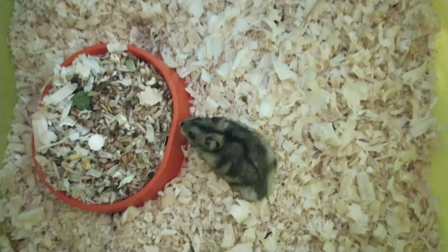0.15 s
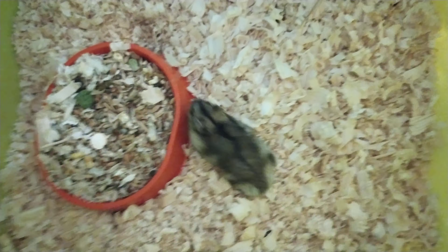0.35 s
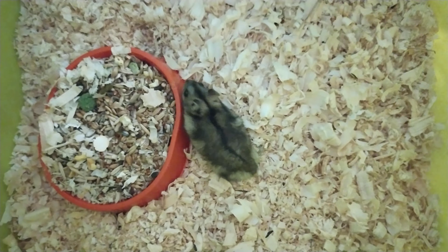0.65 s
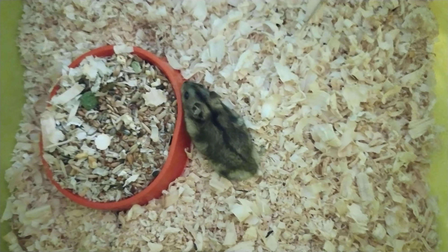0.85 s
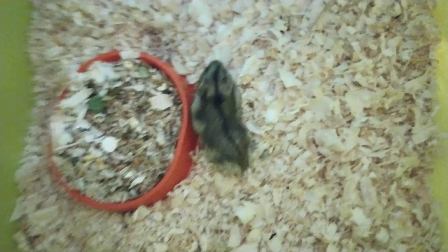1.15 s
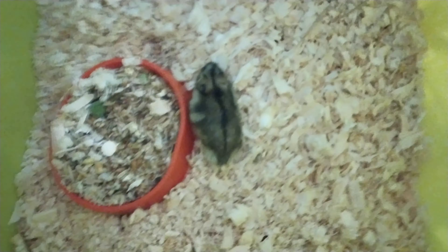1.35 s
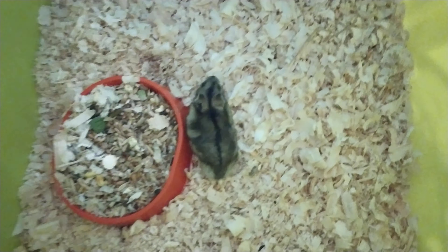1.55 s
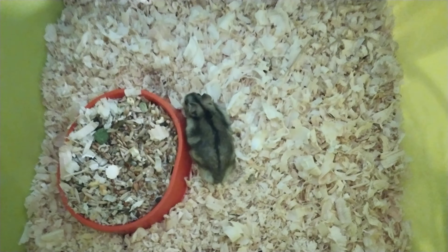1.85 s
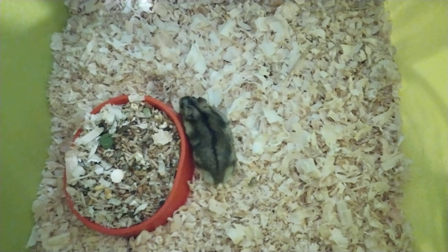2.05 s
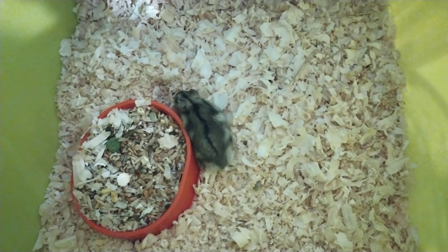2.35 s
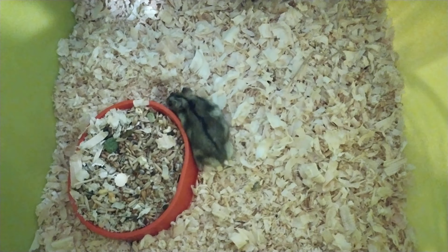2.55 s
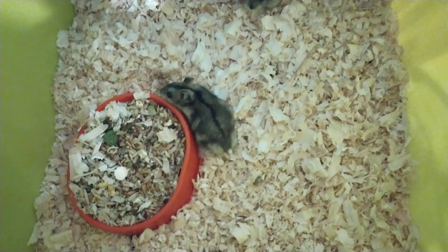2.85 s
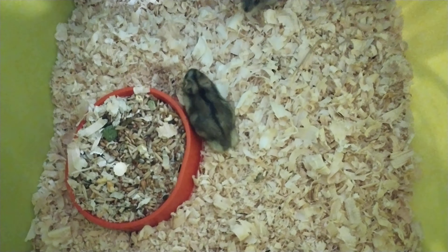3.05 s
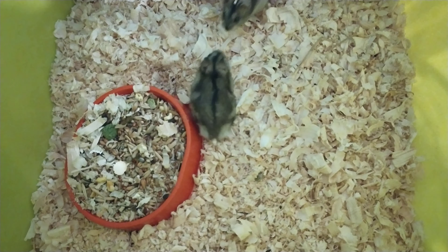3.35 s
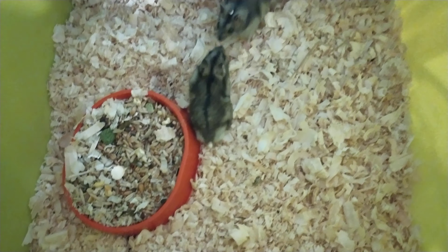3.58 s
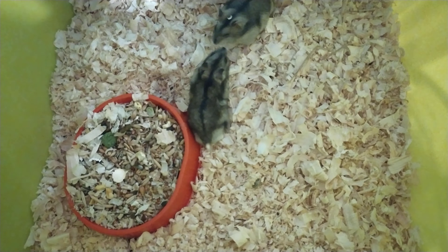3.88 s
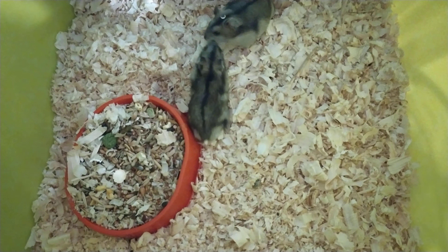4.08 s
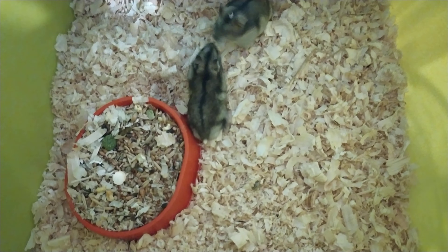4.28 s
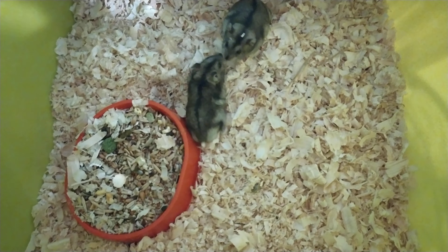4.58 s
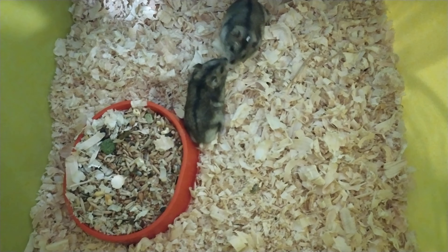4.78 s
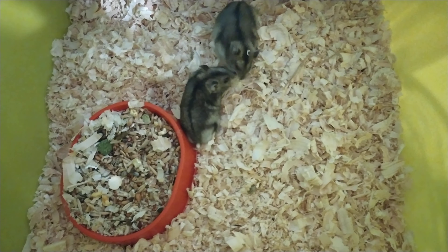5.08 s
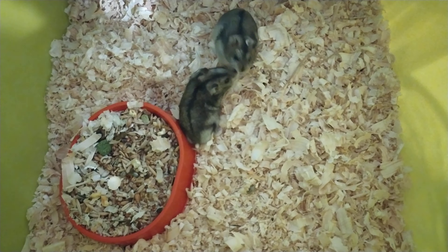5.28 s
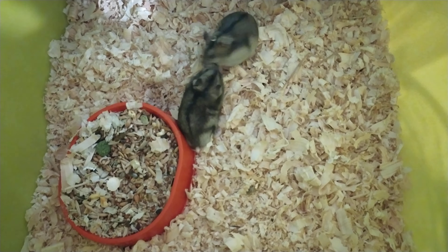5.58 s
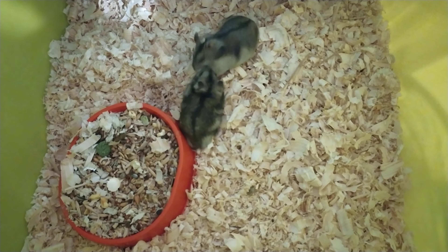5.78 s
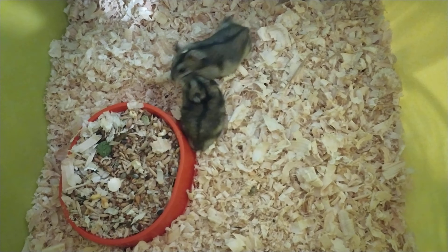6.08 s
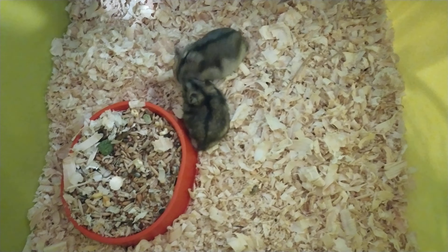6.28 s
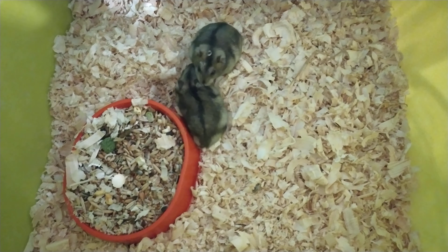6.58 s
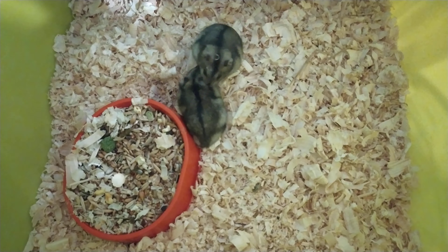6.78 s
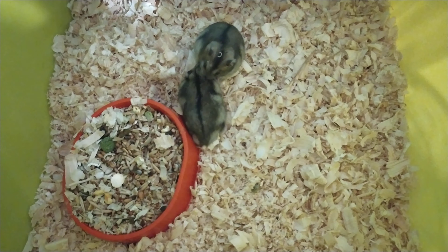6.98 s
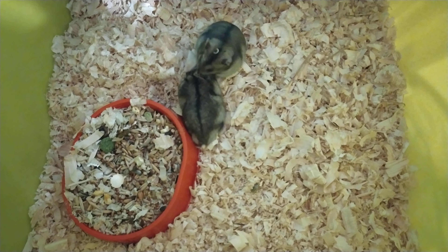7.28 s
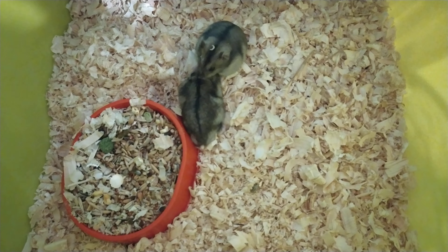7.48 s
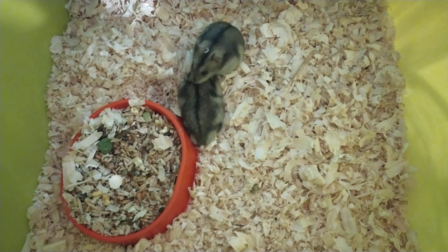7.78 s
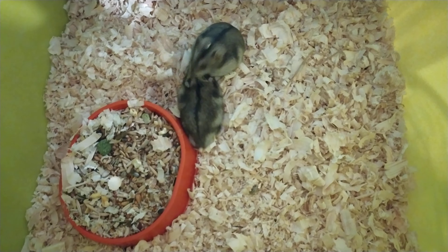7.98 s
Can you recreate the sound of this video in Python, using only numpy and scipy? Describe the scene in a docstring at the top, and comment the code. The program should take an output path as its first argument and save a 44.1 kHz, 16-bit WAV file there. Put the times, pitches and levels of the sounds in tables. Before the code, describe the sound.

Small animals shuffle in dry shavings inside a tub, making clumps of tiny crisp clicks. At first they are close and partly masked by boomy bumps and rumble from a hand gripping the microphone, including one startling tap on the left. After two seconds the handling fades; quieter intermittent rustles and snaps continue over faint hum, with muffled low swells and a late woody tick.

```python
"""Two dwarf hamsters shuffle through wood shavings in a plastic tub, heard by two microphones in a hand-held
casing. A quiet room hums throughout, and the flakes crackle in clumps of tiny clicks, with a snap now and then.
For the first two seconds the hand shifts its grip: the casing's modes knock, low noise rumbles, the skin groans,
and after one second a finger rubs, catches and taps on the left port. The rustle then loses its close
colour; soft dull swells follow from four seconds, and past seven a hamster bumps something hollow."""
import sys
import numpy as np
from scipy import signal
from scipy.fft import rfft, irfft
from scipy.io import wavfile

SR = 44100
rng = np.random.default_rng(int(sys.argv[2]) if len(sys.argv) > 2 else 0)


def master(y):
    """Save y as 16-bit WAV."""
    cut = np.clip(np.atleast_2d(y).T, -1, 1)
    pcm = np.round(cut * 32767)  # scale
    wavfile.write(sys.argv[1], SR, pcm.astype(np.int16))


N = 358923
T, HZ = np.arange(N) / SR, np.fft.rfftfreq(N, 1 / SR)

# tone of the dry flakes: pitch_hz [Hz], density_db [relative dB per Hz]
FLAKE_TONE = [(300, -29.5), (1000, -8.5), (2500, -7), (4800, -6.5), (6300, -5), (7700, -2), (9300, -1.8),
              (10800, -10.5), (13500, -8.5), (16000, -16)]
# a hamster shuffling through the shavings: start_s [s], length_s [s], level_db [dB before trim],
# crisp_db [dB, treble against that level, before trim]
SHUFFLE_MOVES = [(0.0, 0.39, -65, 1), (0.382, 0.21, -61.5, -27), (0.712, 0.2, -61.5, -1.5),
                 (0.925, 0.15, -56.5, -5), (1.064, 0.22, -60.5, 0.5), (1.512, 0.11, -62.5, -11),
                 (1.643, 0.2, -56.5, -7.5), (1.844, 0.53, -68, -1), (2.335, 0.14, -65, 2),
                 (2.552, 0.22, -69, 1), (2.763, 0.22, -67, 4.5), (3.027, 0.08, -63.5, 6),
                 (3.109, 0.082, -61, 2), (3.391, 0.087, -69.5, 9), (4.842, 0.27, -70.5, -4),
                 (5.21, 0.075, -67, 1), (5.428, 0.15, -66, -4), (5.595, 0.2, -64.5, -2),
                 (5.754, 0.26, -62, -2.5), (6.087, 0.064, -65.5, 0), (6.308, 0.073, -68.5, 1),
                 (6.43, 0.068, -68.5, 5), (6.549, 0.15, -70.5, -4.5), (6.745, 0.082, -69.5, 5),
                 (6.894, 0.035, -65.5, -6), (7.019, 0.15, -69, -7), (7.22, 0.065, -63.5, -21),
                 (7.593, 0.15, -66, -7), (7.781, 0.57, -72, -1.5)]
SHUFFLE_RISE_S, SHUFFLE_SETTLE_S = 0.027, 0.021  # the flakes get moving, and come to rest again
REST_DB = -74  # the bedding between shuffles, before trim


def amp(db):
    """Decibels to linear gain."""
    return 10 ** (np.asarray(db) / 20)


def evened(x):
    """Scales to unit rms, taken on the middle of a stereo pair."""
    return x / np.sqrt(np.mean(np.atleast_2d(x).mean(0) ** 2) + 1e-30)


def read(points, hz):
    """Reads a spectrum on a log-frequency axis."""
    f, value = np.transpose(points)
    return np.interp(np.log(hz + 1), np.log(f + 1), value)


def add(mix, s, sound):
    """Mixes a stereo sound in at a time in seconds."""
    part = mix[:, max(round(s * SR), 0):][:, :sound.shape[1]]
    part += sound[:, :part.shape[1]]


def sides(db):
    """Left and right gains for a level difference, left minus right."""
    return amp(np.array([[.5], [-.5]]) * db)


def coloured(x, spectrum):
    """Gives a sound its spectrum and the colour of the two microphone ports, at unit rms."""
    # balance of the ports: pitch_hz [Hz], left_minus_right_db [dB]
    port_balance = [(30, 5), (300, 3.5), (1000, 1.5), (3000, -4), (4800, 5), (6500, 12), (7700, 11),
                    (9300, -2.5), (11000, 0.5), (15000, 5.5)]
    gain = amp(read(spectrum, HZ)) * sides(read(port_balance, HZ))
    return evened(irfft(rfft(x) * gain, N))


def noise(shared):
    """Stereo white noise; a part of relative size `shared` is common to both sides."""
    return rng.standard_normal((2, N)) + shared * rng.standard_normal(N)


def drift(rate_hz):
    """Random wander of unit rms, with little motion faster than rate_hz."""
    return evened(irfft(rfft(rng.standard_normal(N)) * np.exp(-(HZ / rate_hz) ** 2), N))


def level(curve):
    """Gain along a table of times and decibels."""
    return amp(np.interp(T, *np.transpose(curve)))


def gestures(rows, rise_s, fade_s):
    """Gain of overlapping movements (start, length, dB): each rises, holds and dies away."""
    t, power = T[::64], 0
    for s, length, db in rows:
        rise = np.clip((t - s) / rise_s, 0, 1)
        fade = np.exp(-np.maximum(t - s - length, 0) / fade_s)
        power = power + (amp(db) * rise * fade) ** 2
    return np.interp(T, t, np.sqrt(power))


def strokes(rows):
    """Pressure of short strokes (start, dB, length): each peaks at a quarter of its length and eases off."""
    pressure = 0
    for s, db, length in rows:
        u = np.clip((T - s) / length * 4, 0, 40)
        pressure = pressure + amp(db) * u * np.exp(1 - u)
    return pressure


def treble(x, edge_hz):
    """The part of a sound above an edge, with no phase shift."""
    return signal.sosfiltfilt(signal.butter(4, edge_hz, "high", fs=SR, output="sos"), x)


def tub(x, wet_db, t60):
    """The tub's walls throw back a short dense echo, different at each port."""
    t = T[:SR // 5]
    tail = rng.standard_normal((2, len(t))) * amp(-60 * t / t60) * (t > .001)
    tail /= np.linalg.norm(tail, axis=1, keepdims=True)
    return x + amp(wet_db) * signal.oaconvolve(x, tail, axes=1)[:, :N]


def ringing(modes, t):
    """One blow on a set of decaying modes, with a new mix of phases at each port; peak 1."""
    hz, db, t60 = np.transpose(modes)[:, :, None]
    phase = rng.random((2, len(modes), 1))
    ring = (amp(db - 60 * t / t60) * np.sin(2 * np.pi * (hz * t + phase))).sum(1)
    return ring / abs(ring).max()


def room(air_db=-63, mains_hz=50, mains_db=-69.5, drone_hz=146.1, drone_db=-75.5, drone_width_hz=23):
    """Steady room noise, mains hum with a wandering phase, a low narrow-band drone and a thin whine."""
    # tone of the room noise: pitch_hz [Hz], density_db [relative dB per Hz]
    air_tone = [(20, 10.5), (50, -5.5), (90, -13), (150, -6.5), (300, -9.5), (500, -9.5), (900, -17),
                (1900, -24.5), (2650, -18.5), (3200, -25.5), (4300, -22.5), (5600, -25), (7700, -23.5),
                (10500, -28), (16000, -33.5)]
    # steady thin tones: pitch_hz [Hz], level_db [dB]
    thin_tones = [(834.4, -85.5), (1034, -89.5), (2509, -91.5), (2606, -90), (2654, -83)]
    air = amp(air_db) * coloured(noise(0.53), air_tone)
    mains = amp(mains_db) * np.sqrt(2) * np.sin(2 * np.pi * mains_hz * T + .5 * drift(2))
    drone_band = np.exp(-((HZ - drone_hz) / drone_width_hz) ** 2)
    drone = amp(drone_db) * evened(irfft(rfft(noise(0.96)) * drone_band, N))
    whine = 0
    for hz, db in thin_tones:
        whine = whine + amp(db) * np.sqrt(2) * np.sin(2 * np.pi * hz * T + rng.random((2, 1)))
    return air + (mains + drone) * sides(4) + whine


def rumble(hand_db=-2, lumps_db=0.5, swell_lumps_db=2.0):
    """Lumpy low noise: heavy while the hand moves, then soft dull swells, over a deep rumble of sway."""
    # restlessness of the hand, until it settles: time_s [s], level_db [dB before trim]
    grip = [(0, -47.5), (1.85, -48), (1.95, -61.5), (3.4, -82.5)]
    # the hand sliding over the casing: start_s [s], length_s [s], level_db [dB before trim]
    slides = [(.07, 0.076, -42.5), (.14, 0.19, -50), (.49, 0.12, -41.5), (.85, 0.21, -44),
              (1.51, 0.081, -42), (1.67, 0.076, -45), (1.8, 0.059, -43)]
    # soft dull swells later on: start_s [s], length_s [s], level_db [dB before lumps and panning]
    swell_moves = [(4.05, 0.071, -56.5), (4.205, 0.038, -56), (4.27, 0.15, -62), (4.45, 0.14, -67),
                   (4.88, 0.24, -65.5), (5.03, 0.052, -64.5), (5.28, 0.13, -68), (7.43, 0.35, -67.5),
                   (7.625, 0.052, -59.5), (8.0, 0.14, -68)]
    # the deepest rumble, as the casing sways: time_s [s], level_db [dB]
    sway = [(0, -48.5), (1.0, -52), (1.8, -61.5), (2.4, -70), (8.14, -73.5)]
    # tones of the shifting grip, the swells and the sway: pitch_hz [Hz], density_db [relative dB per Hz]
    hand_tone = [(50, -26.5), (95, -7), (130, 1), (240, 1), (300, -8), (450, -17.5), (900, -21),
                 (2500, -61)]
    swell_tone = [(60, -34.5), (130, -0.5), (195, 3.5), (270, -5), (355, 2), (405, -6.5), (450, 0),
                  (650, -19), (1200, -35)]
    deep_tone = [(8, 2), (25, -4.5), (55, -1), (100, -6.5), (200, -23.5), (600, -64.5)]
    lumps = drift(27)
    pressing = gestures(swell_moves, rise_s=0.022, fade_s=0.04)
    sliding = np.hypot(level(grip), gestures(slides, rise_s=0.021, fade_s=0.0061))
    hand = coloured(noise(1.6), hand_tone) * sliding * amp(hand_db + lumps_db * lumps)
    swells = coloured(noise(1.7), swell_tone) * pressing * amp(swell_lumps_db * lumps)
    deep = coloured(noise(3.7), deep_tone) * level(sway)
    return hand + swells * sides(-2.1) + deep


def groans(waver=0.05, pan_db=5):
    """Skin judders on the casing in stick and slip: a short unsteady low tone with a gliding pitch."""
    # judders: start_s [s], length_s [s], level_db [dB before panning], first_hz [Hz], last_hz [Hz], before waver
    judders = [(0.27, 0.083, -43, 121, 133), (0.635, 0.083, -45, 235, 110), (1.52, 0.11, -45.5, 136.6, 119)]
    out, unsteady = np.zeros((2, N)), 1 + waver * drift(40)
    for s, length, db, first_hz, last_hz in judders:
        u = np.arange(0, 1, 1 / (length * SR))
        hz = first_hz * (last_hz / first_hz) ** u * unsteady[round(s * SR):][:len(u)]
        swell = np.sqrt(2 * np.sin(np.pi * u))
        tone = np.sin(2 * np.pi * np.cumsum(hz) / SR)
        add(out, s, amp(db) * sides(pan_db) * swell * tone)
    return out


def knocks(level_db=-10.0, grit_db=-12, grit_s=0.026, grit_width_hz=60, scratch_db=-29, vary_db=-0.5, pan_db=5.0):
    """Each shift of the grip rings the casing's modes; the skin drags briefly and stirs the same modes."""
    # the grip shifting on the casing: start_s [s], strength_db [dB before trims]
    shifts = [(0.103, -28.5), (.142, -49.5), (0.292, -35.5), (0.393, -33.5), (0.427, -35), (0.471, -37.5),
              (0.517, -30.5), (0.548, -29), (0.573, -31), (.59, -45.5), (0.733, -36.5), (0.852, -28.5),
              (0.929, -39), (1.011, -29), (1.073, -32), (1.232, -38), (1.391, -29.5), (1.553, -30.5),
              (1.602, -36), (1.661, -34), (1.689, -29.5), (1.802, -27.5), (1.985, -50), (2.046, -51),
              (2.107, -45), (2.147, -43.5), (2.204, -49), (2.32, -50.5), (2.383, -55), (2.46, -48.5),
              (2.628, -53), (2.739, -45), (2.766, -56), (2.799, -47), (2.875, -53.5), (2.93, -48.5),
              (3.063, -57), (3.132, -53), (3.186, -51.5), (5.503, -49)]
    # what the casing rings with: pitch_hz [Hz], level_db [relative dB], t60_s [s]
    casing = [(244.5, 0.5, 0.12), (281, 0.5, 0.11), (378, -9.5, 0.082), (500, -4.5, 0.074), (571, -3, 0.07),
              (690, -6.5, 0.08), (952.5, -10, 0.054), (1074.3, -14, 0.063), (1335, -20, 0.069),
              (1500, -16.5, 0.03), (2064, -24, 0.028)]
    out, drag, t = np.zeros((2, N)), np.zeros((2, N)), T[:SR // 6]
    hz, db, t60 = np.transpose(casing)[:, :, None]
    rise = np.sin(np.pi / 2 * np.minimum(t / .009, 1))
    for s, strength_db in shifts:
        size, phase, skew = rng.standard_normal((3, len(casing), 1))
        # each mode reaches the two ports a little out of step
        angle = 2 * np.pi * (hz * t + phase) + 0.5 * np.array([skew, -skew])
        ring = (amp(db + vary_db * size - 60 * t / t60) * np.sin(angle)).sum(1) * rise
        ring /= ring[:, t < .03].std()
        add(out, s, amp(strength_db + level_db) * sides(pan_db) * ring)
        add(drag, s, amp(strength_db + grit_db) * (np.sqrt(rise) * np.exp(-t / grit_s))[None])
    # drag noise: a peak at each mode over a broad faint scratch
    scratch = amp(scratch_db) ** 2 / (1 + (HZ / 2900) ** 8)
    peaks = (amp(db) ** 2 / (1 + ((HZ - hz) / grit_width_hz) ** 4)).sum(0)
    grit = evened(irfft(rfft(noise(0.68)) * np.sqrt(scratch + peaks), N) * sides(pan_db))
    return out + grit * drag


def catches(rise_s=.0005, fade_s=0.00037, width_octaves=.45, top_hz=13300, leak_db=-22):
    """A fingertip catches and snaps free: millisecond clicks on the left port, each around its own pitch."""
    # catches: start_s [s], peak_db [dB], pitch_hz [Hz]
    slips_free = [(1.0206, -40, 10100), (1.2545, -22, 11000), (1.264, -24, 8500), (1.3086, -23, 9350),
                  (1.321, -40, 9800), (1.357, -30, 9900)]
    out, t = np.zeros((2, N)), T[:512]
    hz = np.fft.rfftfreq(len(t), 1 / SR) + 1
    envelope = np.minimum(t / rise_s, 1) * np.exp(-np.maximum(t - rise_s, 0) / fade_s)
    for s, db, pitch in slips_free:
        band = 1 / (1 + (np.log2(hz / pitch) / width_octaves) ** 4) / (1 + (hz / top_hz) ** 16)
        click = irfft(rfft(rng.standard_normal(len(t)) * envelope) * band)
        add(out, s, amp(db) * amp([[0], [leak_db]]) * click / abs(click).max())
    return out


def finger(lag_turns=.6, bounce=0.41, bounce_s=.0021, bounce_hz=1100, leak_db=-34, rub_leak_db=-16):
    """Taps on the left port: the highs arrive first and fall to a thud; rubs scratch between them."""
    # taps: start_s [s], peak_db [dB before ring is added], low_hz [Hz], high_hz [Hz]
    taps = [(1.0409, -1, 285.8, 1187), (1.2547, -29.5, 1730, 2600), (1.2662, -23.5, 860, 2470),
            (1.309, -20.5, 684, 1850), (1.321, -40, 1400, 4500), (1.3565, -40, 1190, 4000),
            (1.3581, -17.5, 149, 386)]
    # what the covered port rings with: pitch_hz [Hz], level_db [relative dB], t60_s [s]
    port_modes = [(167.2, -7.5, 0.061), (894, -7, 0.015), (2630, 0.5, .007)]
    # rubs over the port: start_s [s], level_db [dB], length_s [s], treble_db [dB above 5 kHz against level_db]
    rub_strokes = [(1.0395, -26, 0.0018, -7), (1.227, -49, 0.025, 10.5), (1.246, -52, 0.021, 4),
                   (1.264, -29, 0.0071, -8), (1.275, -36, 0.026, -1), (1.305, -34, 0.01, -1),
                   (1.327, -41, 0.019, -6), (1.349, -40.5, 0.012, 1), (1.388, -40, 0.037, -1.5)]
    # tone of the rubbing: pitch_hz [Hz], density_db [relative dB per Hz]
    rub_tone = [(600, 12), (1200, 3.5), (2700, 0.5), (3600, -5.5), (5200, -15.5), (7000, -13), (9000, -1),
                (11500, -1), (14000, -16.5), (16000, -35)]
    out, t = np.zeros((2, N)), T[:4096]
    hz = np.fft.rfftfreq(len(t), 1 / SR) + 1
    for s, db, low, high in taps:
        a, b = 1j * hz / low, 1j * hz / high
        band = a * a / (1 + 0.36 * a + a * a) / (1 + 0.88 * b + b * b) / (1 + 1j * hz / 4200)
        # the soft fingertip lands a second time, duller
        band = band * (1 + bounce * np.exp(-2j * np.pi * hz * bounce_s - (hz / bounce_hz) ** 4))
        tap = irfft(band * np.exp(-2j * np.pi * lag_turns * np.log(hz)))
        tap /= abs(tap).max()
        # a tap mostly rings the modes that lie within its band
        ring = 0
        for f, mode_db, t60 in port_modes:
            outside = np.hypot(1, (low / f) ** 2 + (f / high) ** 2)
            ring = ring + amp(mode_db - 60 * t / t60) * np.sin(2 * np.pi * f * t) / outside
        add(out, s, amp([[db], [db + leak_db]]) * (tap + 2 * ring * np.minimum(t / 0.00879, 1)))
    scratch = irfft(rfft(noise(0)) * amp(read(rub_tone, HZ)), N)
    scratch /= scratch.std()
    top = treble(scratch, 5000)
    body_strokes = strokes([row[:3] for row in rub_strokes])
    top_strokes = strokes([(s, db + top_db, length) for s, db, length, top_db in rub_strokes])
    rubs = (scratch - top) * body_strokes + top * top_strokes
    stick_slip = evened(amp(4.5 * drift(700)))
    return out + rubs * stick_slip * amp([[0], [rub_leak_db]])


def clacks(level_db=2, rise_s=0.00059):
    """A hamster bumps something hard and hollow: a small woody knock with its rebounds."""
    # blows: start_s [s], peak_db [dB before trim and echo]
    blows = [(7.2305, -55), (7.2348, -53), (7.247, -64.5)]
    # what the hollow thing rings with: pitch_hz [Hz], level_db [relative dB], t60_s [s]
    hollow = [(1570, 2, 0.066), (2040, 4, 0.056), (2285, -11.5, .05), (3360, -9, .04), (3480, -4, 0.046)]
    out, t = np.zeros((2, N)), T[:SR // 8]
    for s, db in blows:
        add(out, s, amp(db + level_db) * ringing(hollow, t) * np.minimum(t / rise_s, 1))
    return tub(out, wet_db=-0.5, t60=0.035)


def scuffs():
    """A paw pushes deep and drags a pad of shavings: grainy noise, duller than the surface crackle."""
    # pushes: start_s [s], level_db [dB], length_s [s]
    pushes = [(5.23, -65, 0.06), (5.41, -67, 0.073), (5.70, -64, 0.14), (5.83, -61.5, 0.1),
              (6.10, -65, 0.037), (7.231, -63.5, 0.035)]
    # tone of the dragged pad: pitch_hz [Hz], density_db [relative dB per Hz]
    pad_tone = [(400, -8), (1000, 1), (1520, -2.5), (1900, -8), (2400, 0), (3000, -5), (12000, -13)]
    grain = evened(amp(6.5 * drift(450)))
    return coloured(noise(0) * grain, pad_tone) * strokes(pushes)


def snaps(level_db=-5, fade_s=0.0017, crisp_db=9, pan_db=5.5):
    """A flake breaks in a burst of a few milliseconds; the driest ones reach the very top."""
    # breaks: start_s [s], strength_db [dB before trim], treble_db [dB, tilt of the top before crisp_db]
    breaks = [(0.931, -33, 10), (1.704, -27, -12), (1.9703, -44, -20), (2.3214, -41.5, -8),
              (2.4233, -43, -7), (2.876, -39, -4), (3.0627, -42, -5), (3.1786, -40, -9),
              (4.0835, -42.5, -18), (4.253, -42, -19), (4.3665, -33, 2), (4.904, -42, -24),
              (4.952, -38.5, -8.5), (5.477, -41.5, -1), (5.604, -39, 2), (5.6842, -36, -16),
              (5.756, -42, -20), (5.823, -44, -20), (5.9506, -45, -12), (6.342, -44.5, -12),
              (6.7747, -44.5, -4), (6.9002, -42.5, -12)]
    out, t = np.zeros((2, N)), T[:1024]
    hz = np.fft.rfftfreq(len(t), 1 / SR)
    envelope = np.minimum(t / 0.0025, 1) * np.exp(-t / fade_s)
    for s, db, top_db in breaks:
        colour = read(FLAKE_TONE, hz) + (top_db + crisp_db) * np.interp(hz, [9000, 11500], [0, 1])
        burst = evened(irfft(rfft(rng.standard_normal((2, len(t)))) * amp(colour)))
        add(out, s, amp(db + level_db) * sides(pan_db) * burst * envelope)
    return tub(out, wet_db=-10, t60=0.05)


def stirring():
    """Gain of the rustle: shuffles over the bedding at rest."""
    moves = [row[:3] for row in SHUFFLE_MOVES]
    return np.hypot(amp(REST_DB), gestures(moves, SHUFFLE_RISE_S, SHUFFLE_SETTLE_S))


def fizzing(rest_crisp_db=-5.5):
    """Gain of the very top of the rustle, slower to rise and settle than the rest."""
    crisp = [(s, length, db + top_db) for s, length, db, top_db in SHUFFLE_MOVES]
    return np.hypot(amp(REST_DB + rest_crisp_db), gestures(crisp, 2 * SHUFFLE_RISE_S, 2 * SHUFFLE_SETTLE_S))


def shavings(per_s=2000, spread_db=4.5, clump_db=1.06, ring_s=0.00048, level_db=-0.5, crisp_db=1,
             uneven_db=1.38, count=48):
    """Thousands of tiny slips a second, in clumps; each flake gives a dry click with a hint of its own pitch."""
    # sharper tone while the microphones are close: pitch_hz [Hz], gain_db [dB]
    close_tone = [(2500, 6.5), (4200, -2.5), (5500, -4.5), (7000, -1.5), (9000, 2.5), (11000, 3.5),
                  (15000, -2)]
    size = amp(spread_db * np.minimum(rng.exponential(1, N), 5) + clump_db * drift(70.5))
    slips = size * (rng.random(N) < per_s / SR)
    flake, t = rng.integers(0, count, N), T[:128]
    pitch = np.geomspace(2000, 15000, count)[:, None, None]
    tone = np.sin(2 * np.pi * (pitch * t + rng.random((count, 2, 1)))) * np.sqrt(pitch / pitch.mean())
    rings = (0.59 * tone + rng.standard_normal((count, 2, len(t)))) * np.exp(-t / ring_s)
    grains = np.zeros((2, N))
    for k in range(count):
        grains += signal.oaconvolve((slips * (flake == k))[None], rings[k], axes=1)[:, :N]
    rustle = coloured(tub(grains, wet_db=-4, t60=0.035), FLAKE_TONE)
    # the microphones draw back between these two times
    near = np.interp(T, [1.62, 2.2], [1, 0])
    rustle = (1 - near) * rustle + near * irfft(rfft(rustle) * amp(read(close_tone, HZ)), N)
    top = treble(rustle, 10300)
    # crisp flakes add a restless fizz at the very top
    restless = amp(crisp_db + 1.2 * drift(60) + uneven_db * drift(12))
    crackle = (rustle - top) * stirring() + top * fizzing() * restless
    return crackle * amp(level_db + uneven_db * drift(9.2))


def scene():
    """Room, hand and bedding together."""
    background = room() + rumble()
    hand = groans() + knocks() + catches() + finger()
    bedding = clacks() + scuffs() + snaps() + shavings()
    return background + hand + bedding


def record(dry):
    """Clips at full scale and cuts everything above the band limit."""
    lowpass = signal.firwin(511, 15850, window=("kaiser", 9), fs=SR)
    return signal.oaconvolve(np.clip(dry, -1, 1), lowpass[None], "same")


dry = scene()
out = record(dry)
master(out)
```